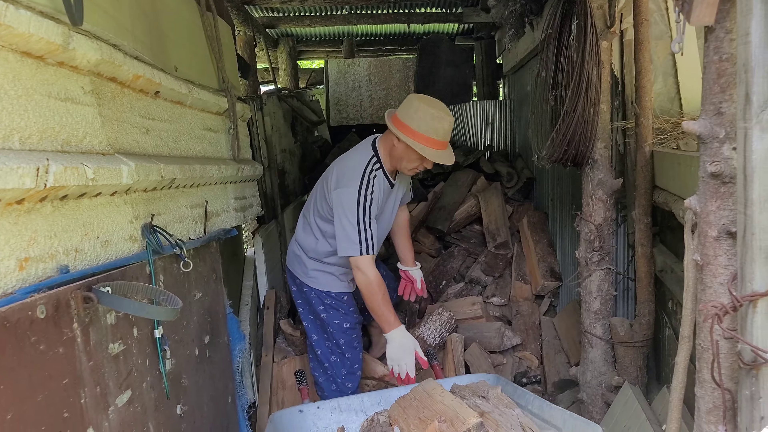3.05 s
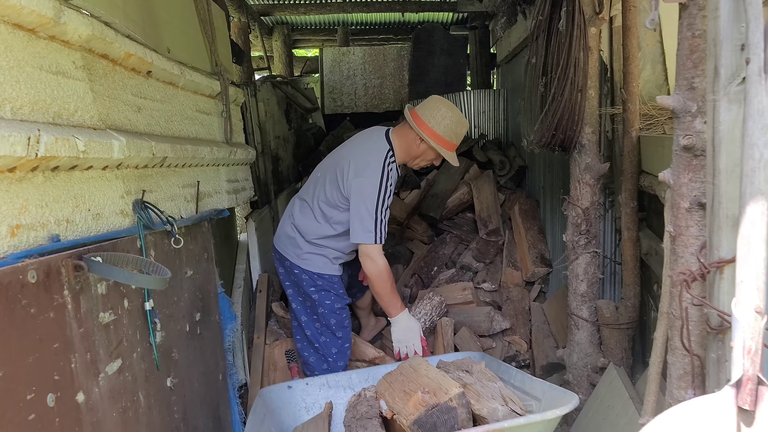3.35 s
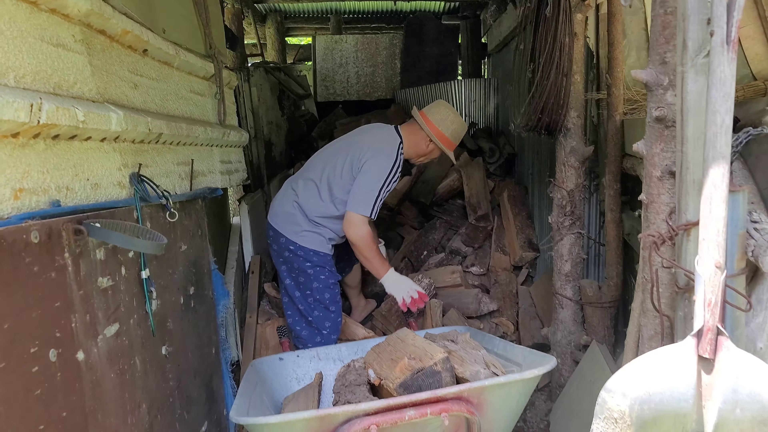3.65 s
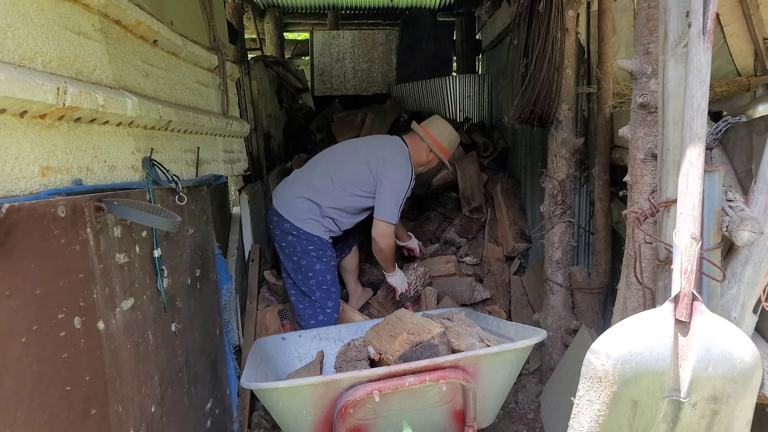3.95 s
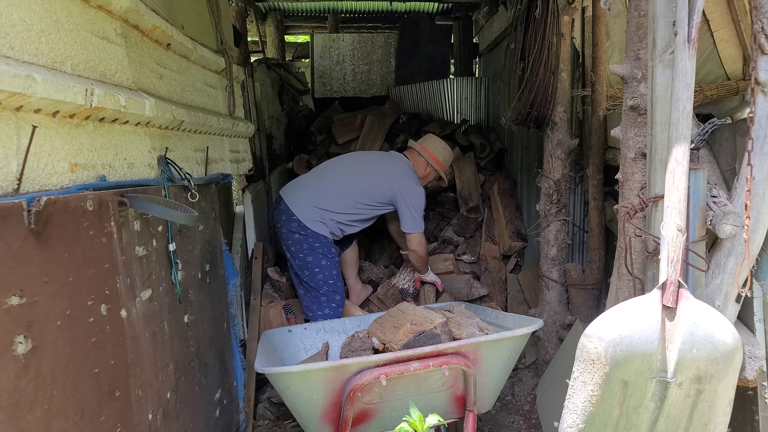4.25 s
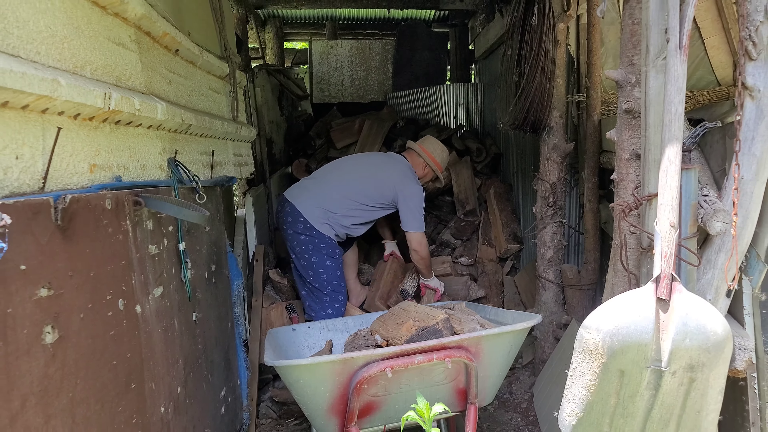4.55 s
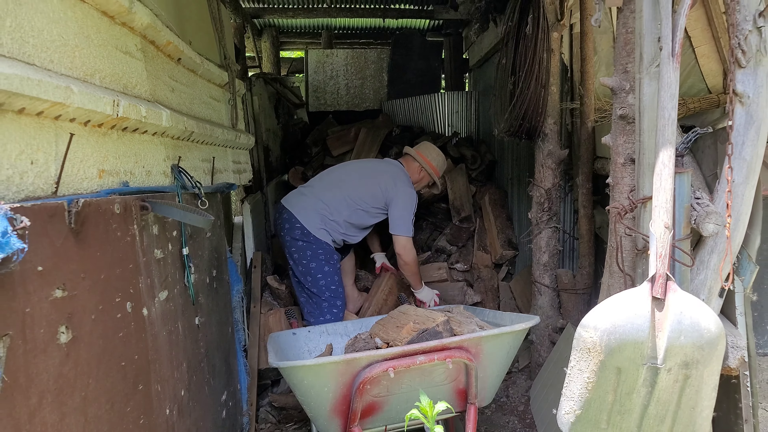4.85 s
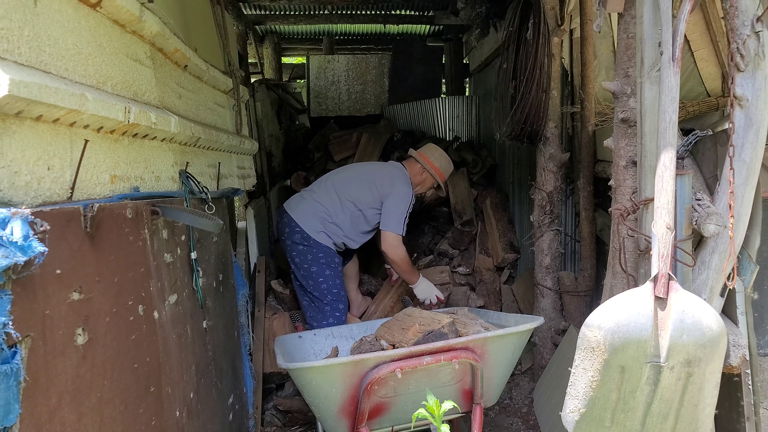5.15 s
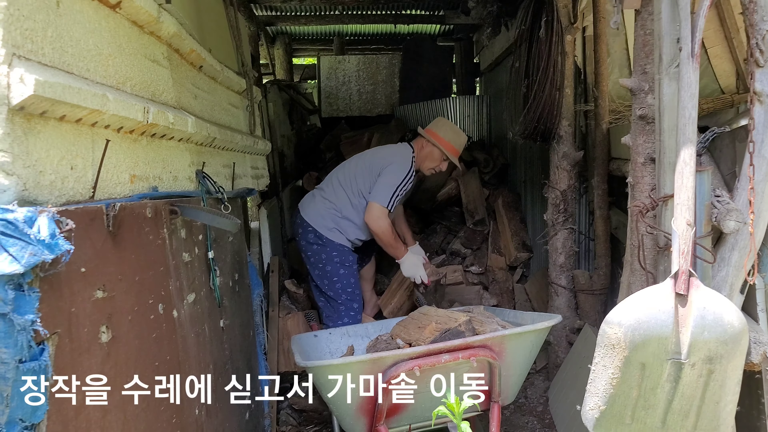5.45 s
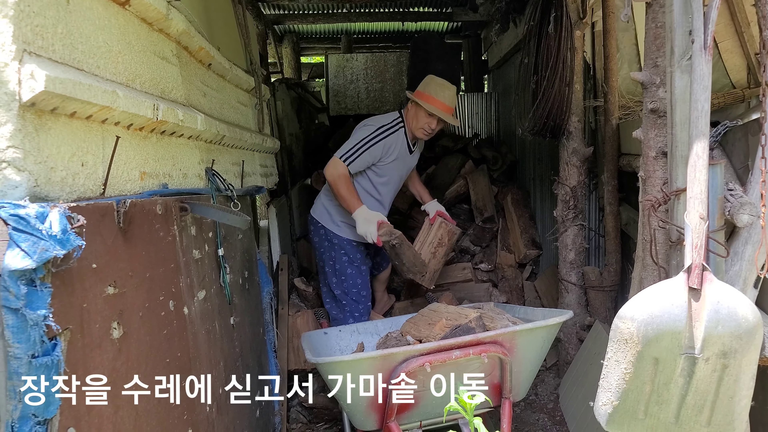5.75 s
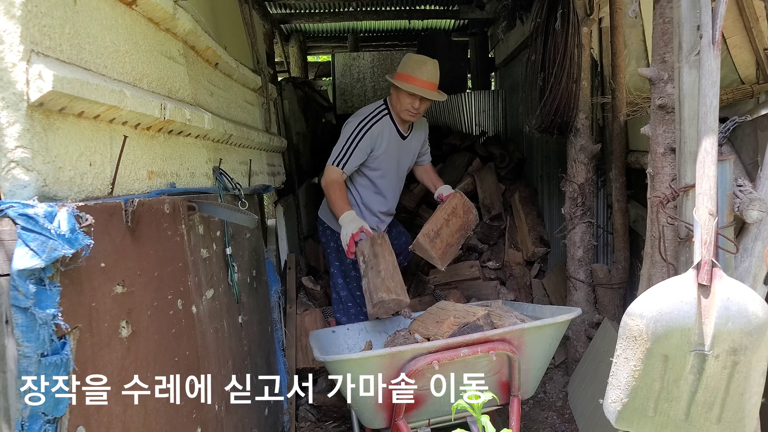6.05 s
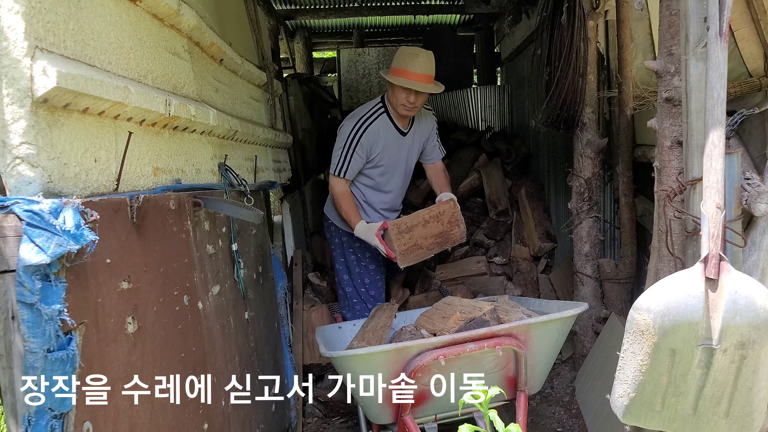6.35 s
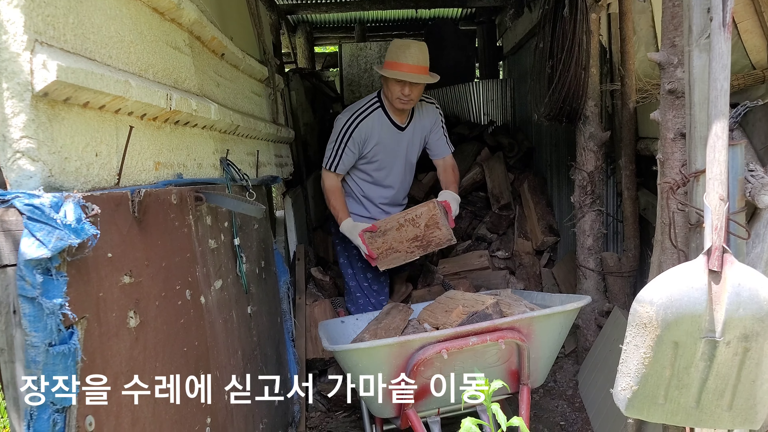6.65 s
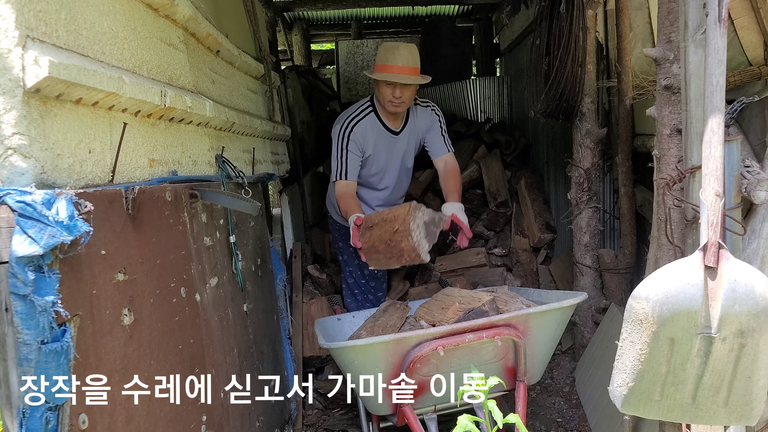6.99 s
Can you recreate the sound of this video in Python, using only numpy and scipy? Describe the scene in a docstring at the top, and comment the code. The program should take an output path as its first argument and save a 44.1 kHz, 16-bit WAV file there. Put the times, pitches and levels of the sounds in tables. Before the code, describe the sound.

Three loads of logs crash into a ringing metal wheelbarrow, with wooden knocks and bark scraping in between.

```python
"""Split firewood is thrown into a steel wheelbarrow at the mouth of a woodshed.
Logs knock and bark scuffs at the pile while air nudges the microphone. At 1.8 s a load tumbles in,
bounces to rest and sets the tray ringing. One log clacks on another just before the second load, at 3 s.
More logs are picked off the pile; the third load lands at 6.3 s.
Behind it all lies an outdoor hush, with a few whistles from a far bird."""
import sys
import numpy as np
from scipy import signal
from scipy.io import wavfile

SR = 44100
rng = np.random.default_rng(int(sys.argv[2]) if len(sys.argv) > 2 else 0)


def master(y):
    """Save y as 16-bit WAV."""
    cut = np.clip(np.atleast_2d(y).T, -1, 1)
    pcm = np.round(cut * 32767)  # scale
    wavfile.write(sys.argv[1], SR, pcm.astype(np.int16))


N = 313992
BANDS_HZ = 1000 * 2 ** (np.arange(-16, 13) / 3)   # third-octave centres


def tumble(bounces=6, first_gap_s=.034, gap_ratio=.92, lead_in_s=0.011, lead_in_db=-16.5, pause_s=.5):
    """Each load starts with a faint lead-in, lands, then bounces ever weaker. Rows as in landings."""
    landings = [(1.772, -18.5, -18, -23.5), (1.785, -14.5, -7, -19.5), (1.792, -23, -11.5, -26),
                (1.808, -13.5, -24, -24.5), (1.850, -27.5, -24, -22), (1.891, -14, -22, -35),
                (2.955, -27.5, -17.5, -21.5), (2.966, -10.5, -24, -40.5), (3.007, -7.5, -12.5, -18.5),
                (3.030, -18.5, -10, -21.5), (3.054, -13.5, -11.5, -21), (3.090, -21, -18.5, -23),
                (6.309, -21, -19, -28), (6.332, -12, -21.5, -23.5), (6.358, -27.5, -19, -32.5)]   # hard contacts: t/s, thud/dB, clang/dB, crack/dB
    settlings = [(1.912, 2, -26.5, -31, -49), (3.122, 7, -19, -13.5, -27), (6.379, 3.5, -24.5, -22, -34.5)]   # bounce runs: t/s, loss per bounce/dB, thud/dB, clang/dB, crack/dB
    contacts, previous_s = [], 0
    for s, *levels in landings:
        if s - previous_s > pause_s:   # start of a load
            contacts.append([s - lead_in_s] + [db + lead_in_db for db in levels])
        contacts.append([s] + levels)
        previous_s = s
    for s, loss_db, *levels in settlings:
        for k in range(bounces):
            contacts.append([s] + [db - k * loss_db for db in levels])
            s += first_gap_s * gap_ratio ** k * rng.uniform(.85, 1.15)
    return contacts


def tray_crash(bands, contacts, blow_db=1.0, blow_t60_s=0.19, tail_db=-7, tail_top_hz=4800):
    """Each contact gives a short blow, damped by the log; then the steel rattles on freely."""
    weak_modes = [(36, -35), (64, -23), (100, -15.5), (140, -21), (230, -4.5), (330, -6), (500, -7.5),
                  (780, -12), (1050, -12), (1550, -4), (3000, -8), (7500, -11.5), (10000, -12),
                  (15000, -18.5)]   # tray and logs: f/Hz, band level/dB
    crowding = [(250, -1), (1000, 0.5)]   # modes lie thinner in the bass: f/Hz, gain/dB
    decay = [(60, .7), (200, .68), (480, .88), (800, .8), (1400, .6), (2700, .43), (4500, .27), (8000, .21)]   # free steel: f/Hz, t60/s
    out = np.zeros((2, N))
    for s, *levels in contacts:
        top_db = tray_load(s)[-1]
        colour_db = at_hz(blow_spectrum(*levels, top_db)) + at_hz(weak_modes)
        tail_colour_db = colour_db + tail_db + at_hz(crowding) + roll_off_db(BANDS_HZ / tail_top_hz)
        blow = dense_ring(bands, colour_db + blow_db, blow_t60_s, rise_s=0.0034)
        tail = dense_ring(bands, tail_colour_db, at_hz(decay), rise_s=0.014)
        add(out, s, through_wood(blow, body_s=0.0027, share=0.71))
        add(out, s, through_wood(tail, body_s=0.0065, share=0.72))
    return out


def tray_and_log_ring(contacts, modes_db=-8, kick_rad=1.8, rise_s=0.0019):
    """Contacts feed the tray's strong ringing tones and the logs' hollow knock, and kick their phase."""
    modes = [(98.2, -9.5, 0.29), (198.6, -6, .8), (226.6, 1, 0.97), (307, -1, .75), (342.8, -3.5, .7),
             (429, -4.5, 1.15), (492, -10, 1.0), (565.5, -9.5, 0.97), (652.4, -4, 0.56), (698, -6, 0.8),
             (758, 0, 0.38), (790.5, -8, .72), (970, -10, .45), (1065, -3, .17), (1240, -7, .38),
             (1312, -5, .34), (1378, -9, .38), (1480, -7, .3)]   # before loading: f/Hz, level/dB, t60/s; 758 and 1065 Hz are the logs
    out = np.zeros((2, N))
    age_s = np.arange(SR, dtype=np.float32) / SR
    pitch_ratio = tray_load(np.arange(N) / SR)[0]
    clock_s = np.cumsum(pitch_ratio) / SR   # runs faster as the load stiffens the tray
    pole = np.exp(-1 / (rise_s * SR))
    for hz, level_db, t60_s in modes:
        high_share = at_hz([(300, 0), (450, 0.77)], hz)
        energy, kicks_rad = np.full((1, N), 1e-18), np.zeros((2, N))
        kicks_rad[:, 0] = rng.uniform(0, 2 * np.pi, 2)
        for s, *levels in contacts:
            _, low_db, high_db, low_t60_ratio, top_db = tray_load(s)
            load_db = low_db + high_share * (high_db - low_db)
            gain = from_db(at_hz(blow_spectrum(*levels, top_db), hz) + level_db + load_db + modes_db)
            ring_s = t60_s * (low_t60_ratio + high_share * (1 - low_t60_ratio))
            add(energy, s, gain ** 2 * np.exp(np.float32(-2 * np.log(1000) / ring_s) * age_s)[None])
            onset = int(s * SR)
            kicks_rad[:, onset] = kick_rad * gain / np.sqrt(energy[0, onset]) * rng.standard_normal(2)
        envelope = signal.lfilter([1 - pole], [1, -pole], np.sqrt(energy[0]))
        phase_rad = signal.lfilter([1 - pole], [1, -pole], np.cumsum(kicks_rad, axis=1))
        mid, side = np.sin(np.float32(2 * np.pi * hz * clock_s + phase_rad))
        out += envelope * spread(mid, side, hz)
    return out


def tray_load(s):
    """The load presses on the tray and changes its ring: the state at time s."""
    # t/s, pitch ratio, low modes/dB, high modes/dB, low-mode t60 ratio, top treble/dB
    states = [(1.951, 1.003, 0.5, -5.5, 0.95, -9.5), (2.9, 1.02, 0.5, -4.5, 0.8, -1),
              (3.253, 1.02, -6, 4, 0.46, -3), (6.202, 1.068, 4, -7, 0.67, -14)]
    times_s, *columns = np.transpose(states)
    return [np.interp(s, times_s, column) for column in columns]


def blow_spectrum(thud_db, clang_db, crack_db, top_db):
    """Force of one contact: f/Hz, level/dB."""
    return [(340, thud_db), (560, clang_db), (1150, clang_db),
            (1500, crack_db), (6500, crack_db), (13000, crack_db + top_db)]


def log_clack(bands, crack_db=3, crack_t60_s=0.0996, modes_db=-4, shed_db=-20, shed_t60_s=0.63):
    """Dry log on dry log: a bright crack, a short answer from the shed, the log's own modes."""
    hits = [(2.8744, -22.5)]   # t/s, level/dB
    modes = [(880, 3, 0.071), (1292, -9.5, 0.1), (1920, -4.5, 0.13), (2353, 4.5, .09), (3838, -3, 0.17),
             (3930, -1.5, 0.12), (5020, -9, 0.09), (5655, -6, 0.16), (6460, -3.5, 0.073),
             (7540, -3.5, 0.086), (8900, -12, .07), (10900, -9, 0.076)]   # f/Hz, level/dB, t60/s
    colour = [(100, -38.5), (600, -23), (900, -11), (1400, -8.5), (2500, -4.5), (3200, -12), (4000, -1.5),
              (7500, -5), (9500, -15), (15000, -8.5)]   # crack spectrum: f/Hz, band level/dB
    out = np.zeros((2, N))
    for s, db in hits:
        crack = dense_ring(bands, db + crack_db + at_hz(colour), crack_t60_s, rise_s=.0008)
        add(out, s, through_wood(crack, body_s=0.0013, share=0.84))
        add(out, s, dense_ring(bands, db + shed_db + at_hz(colour), shed_t60_s, rise_s=.008))
        for hz, level_db, t60_s in modes:
            add(out, s, from_db(db + level_db + modes_db) * mode(hz, t60_s, rise_s=0.0012))
    return out


def woodpile(bands, knock_db=-2, tick_db=-1, modes_db=-9):
    """Logs pulled loose strike the pile: a tick, a knock and three modes that vary from log to log."""
    knocks = [(0.109, -29.5, -69, -38), (0.2641, -33, -46, -34), (0.313, -36, -34, -24),
              (0.3585, -25, -33.5, -29), (0.423, -19.5, -52, -29), (0.6007, -34.5, -69, -41),
              (0.703, -41, -52, -45), (0.755, -29, -31.5, -43), (0.787, -25, -35, -25.5),
              (0.833, -28.5, -49, -40), (0.9469, -21, -45.5, -27), (1.029, -28, -61, -35),
              (1.23, -31.5, -49.5, -46), (1.5652, -54, -58.5, -43.5), (1.603, -47, -56.5, -38),
              (2.4497, -49.5, -64, -69), (2.6, -46.5, -60, -49), (3.707, -55, -75, -56),
              (3.909, -51, -60.5, -63), (4.1036, -50.5, -60, -58), (4.1799, -46, -54, -54.5),
              (4.702, -42, -51.5, -47), (4.8424, -32, -30.5, -40.5), (4.9308, -35.5, -48, -40.5),
              (5.1405, -34, -65, -37), (5.4131, -59, -41, -68), (5.6336, -50, -65, -54.5),
              (5.696, -52, -67.5, -61), (5.8376, -51.5, -64.5, -58), (6.557, -37.5, -63, -46),
              (6.6188, -40.5, -57, -41.5), (6.9321, -35, -56.5, -43)]   # t/s, snap/dB, body/dB, splinter/dB
    colour = [(50, -25.5), (200, -15), (350, -12.5), (700, 5), (1100, -10.5), (1500, -11), (2200, -14.5),
              (4000, -11.5), (8000, -9), (15000, -24.5)]   # knock spectrum: f/Hz, band level/dB
    decay = [(100, 0.4), (700, 0.04), (2000, 0.13), (12000, 0.053)]   # knock decay: f/Hz, t60/s
    out = np.zeros((2, N))
    for s, snap_db, body_db, splinter_db in knocks:
        force = [(800, body_db), (1400, snap_db), (4000, snap_db), (7500, splinter_db)]
        colour_db = at_hz(force) + at_hz(colour)
        knock = dense_ring(bands, colour_db + knock_db, at_hz(decay), rise_s=0.003)
        tick = dense_ring(bands, colour_db + tick_db, t60_s=0.025, rise_s=0.00004)
        add(out, s, tick)
        add(out, s, through_wood(knock, body_s=0.00063, share=0.96))
        for hz in np.array([1500, 2000, 2600]) * np.exp(rng.normal(0, 0.1197, 3)):
            add(out, s, from_db(snap_db + modes_db) * mode(hz, t60_s=0.076, rise_s=0.00017))
    return out


def ground_bumps(bands, slope_db_per_oct=7, dull_hz=900, deep_hz=45):
    """A foot, a log or the barrow's legs meet the ground: a broad low hump with no treble."""
    bumps = [(0.435, -64, 65), (0.76, -40, 201), (0.829, -50, 90), (1.807, -21, 85), (2.962, -16.5, 76.3),
             (3.006, -25, 71.6), (4.841, -32.5, 216), (6.318, -24, 99.3)]   # t/s, level/dB, centre/Hz
    edges_db = roll_off_db(BANDS_HZ / dull_hz) + roll_off_db((deep_hz / BANDS_HZ) ** 2)
    out = np.zeros((2, N))
    for s, db, hz in bumps:
        hump_db = -slope_db_per_oct * abs(np.log2(BANDS_HZ / hz))
        add(out, s, dense_ring(bands, db + hump_db + edges_db, t60_s=0.16, rise_s=0.003))
    return out


def bark(bands, slips_per_s=700, size_db=0.5, grain_s=0.0014, rub_share=.35, ridge_s=0.0093, level_db=-2):
    """Bark fibres catch and let go: tiny bursts of uneven size over a smooth rub."""
    colour = [(200, -25.5), (400, -23.5), (700, -9.5), (1100, -7), (1500, -1), (2000, -3), (3000, -4),
              (4500, -5), (8000, -2), (15000, -9)]   # rub spectrum: f/Hz, band level/dB
    slipping = rng.random(N) < slips_per_s / SR
    slips = slipping * from_db(size_db * np.minimum(rng.exponential(1, N), 5.5))
    energy = signal.lfilter([1], [1, -np.exp(-1 / (grain_s * SR))], slips ** 2 + 1e-18)
    grains = unit_rms(np.sqrt(rub_share + energy / energy.mean()))
    band_gain = from_db(at_hz(colour))
    top_share = at_hz([(4000, 0.031), (7000, 1.0)])
    rasp, crisp = np.tensordot(np.float32([band_gain * (1 - top_share), band_gain * top_share]), bands, 1)
    rasp_gain, crisp_gain = bark_strokes()
    grip_db = np.interp(np.arange(N) / SR / ridge_s, np.arange(2000), rng.standard_normal(2000))
    rub = from_db(level_db + grip_db) * grains * (rasp_gain * rasp + crisp_gain * crisp)
    out, block = np.zeros((2, N)), 2048
    for start in range(0, N, block):   # the rub passes from one piece of wood to the next
        piece = np.pad(rub[:, start:start + block], ((0, 0), (0, block)))
        add(out, start / SR, through_wood(piece, body_s=0.00042, share=.2))
    return out


def bark_strokes():
    """Strokes of bark on bark: gains of the rasp and of its crisp top."""
    strokes = [(0.0, 0.17, -47.5, -2, -7.5), (0.202, 0.065, -40.5, 12.5, -2.5), (0.3, 0.11, -42, 0, -6.5),
               (0.475, .17, -58.5, 0, -5), (0.715, 0.037, -54.5, 4, -15), (0.784, 0.056, -50, -5, -7),
               (0.873, .06, -56, 0, -7), (0.945, 0.026, -42.5, -0.5, -7.5), (1.004, 0.046, -42, 0, -5.5),
               (1.06, 0.14, -50, 4.5, -7.5), (1.222, 0.26, -62, -10.5, -8), (1.59, 0.031, -61.5, -3, -0.5),
               (2.331, 0.61, -67, 16.5, -1.5), (3.983, 0.031, -70, 1, -2), (4.373, 0.039, -71, -3, -3),
               (4.492, 0.085, -58, 10.5, -12.5), (4.624, 0.12, -65, 4, -7.5),
               (4.767, 0.097, -54.5, 3.5, -7), (4.928, 0.085, -59, -7, -7), (5.12, 0.067, -52.5, 4.5, -5),
               (5.213, 0.15, -69.5, 15, -1.5), (5.416, 0.085, -57.5, -7, -13.5),
               (6.151, .03, -72.5, 1.5, -3), (6.695, 0.039, -54.5, 3.5, -7), (6.855, 0.033, -63, 9, -3),
               (6.982, 0.097, -67, -3, -0.5)]   # t/s, length/s, rasp/dB, growth/dB, crispness/dB
    rasp, crisp = np.zeros((2, N))
    for s, length_s, db, growth_db, crisp_db in strokes:
        power = swell(s, length_s, db, growth_db, attack_s=0.12, release_s=0.24)
        rasp += power
        crisp += power * from_db(crisp_db) ** 2
    return np.sqrt(rasp), np.sqrt(crisp)


def air(bands, breeze_db=-1):
    """Soft low buffets on the microphone over an outdoor hush."""
    puffs = [(0.0, 0.0097, -35), (0.165, 0.29, -41.5), (0.495, 0.042, -44), (0.754, 0.05, -39),
             (0.976, 0.065, -43.5), (1.224, 0.098, -54), (1.37, .05, -58), (2.35, 0.26, -69),
             (3.9, 0.56, -80), (4.56, 0.066, -65), (4.85, 0.051, -47.5), (4.993, .03, -45),
             (5.276, 0.035, -49.5), (5.441, 0.028, -58.5), (6.668, 0.086, -51), (6.91, 0.14, -67)]   # t/s, length/s, level/dB
    breeze = [(25, -17.5), (45, -12), (68, -2), (100, -9.5), (160, -16), (300, -27.5), (600, -21),
              (1500, -73)]   # buffet spectrum: f/Hz, band level/dB
    still_air = [(25, -92.5), (62, -81.5), (120, -85), (300, -74), (700, -72.5), (1600, -76), (4000, -80.5),
                 (8000, -85), (15000, -90)]   # f/Hz, band level/dB
    hush, buffets = np.tensordot(np.float32(from_db([at_hz(still_air), at_hz(breeze)])), bands, 1)
    power = sum(swell(*puff, growth_db=0, attack_s=0.17, release_s=.55) for puff in puffs)
    return hush + from_db(breeze_db) * np.sqrt(power) * buffets


def bird(flutter_db=4):
    """Thin gliding whistles, some sagging midway, arrive unsteady from far off."""
    whistles = [(1.45, .11, 5080, 5420, 140, -74), (2.31, .12, 5020, 4240, 840, -70.5),
                (4.02, .12, 4130, 4050, 0, -78.5), (4.2, .11, 4140, 4100, 0, -79),
                (4.36, .11, 4120, 4080, 0, -79.5)]   # t/s, length/s, start/Hz, end/Hz, dip/Hz, level/dB
    out = np.zeros((2, N))
    for s, length_s, start_hz, end_hz, dip_hz, db in whistles:
        along = np.linspace(0, 1, int(length_s * SR))
        hz = start_hz + (end_hz - start_hz) * along - dip_hz * np.sin(np.pi * along)
        tone = np.sin(2 * np.pi * np.cumsum(hz) / SR + rng.uniform(0, np.pi, (2, 1)))
        flutter = np.interp(along, np.linspace(0, 1, 24), rng.standard_normal(24))
        add(out, s, tone * from_db(db + flutter_db * flutter) * signal.windows.tukey(len(along), .3))
    return out


def dense_ring(bands, level_db, t60_s, rise_s):
    """Countless close modes struck at once: each band swells, the lows later, and dies away."""
    t = np.arange(int(min(np.max(t60_s), .8) * SR), dtype=np.float32) / SR
    start = int(rng.random() * (N - SR))
    decay_per_s = np.float32(np.log(1000) / t60_s * np.ones(len(BANDS_HZ)))[:, None]
    band_rise_s = np.float32(rise_s + .4 / BANDS_HZ)[:, None]
    gain = np.float32(from_db(level_db))[:, None]
    envelope = gain * np.exp(-decay_per_s * t) * (1 - np.exp(-t / band_rise_s))
    return np.einsum("bt,bct->ct", envelope, bands[:, :, start:start + len(t)])


def mode(hz, t60_s, rise_s):
    """One struck mode; its phase at each microphone depends on where the blow falls."""
    t = np.arange(int(t60_s * SR)) / SR
    mid, side = np.sin(2 * np.pi * (hz * t + rng.random((2, 1))))
    return spread(mid, side, hz) * np.exp(-np.log(1000) * t / t60_s) * (1 - np.exp(-t / rise_s))


def through_wood(sound, body_s, share):
    """Each piece of wood lends the treble its own uneven comb of short resonances."""
    t = np.arange(int(5 * body_s * SR)) / SR
    response = rng.standard_normal(len(t)) * np.exp(-t / body_s)
    response *= np.sqrt(share / np.sum(response ** 2))
    response[0] = np.sqrt(1 - share) - 1   # the direct sound gives up that share of its energy
    high_pass = signal.butter(2, 400, "high", fs=SR, output="sos")
    treble = signal.sosfiltfilt(high_pass, np.pad(response, 64))
    return sound + signal.fftconvolve(sound, treble[None], axes=1)[:, 64:64 + sound.shape[1]]


def swell(s, length_s, db, growth_db, attack_s, release_s):
    """Power of one gesture: rises 60 dB, holds while growing or easing, falls 60 dB."""
    times_s = np.cumsum([s - attack_s, attack_s, length_s, release_s])
    levels_db = db + growth_db / 2 * np.array([-1, -1, 1, 1]) - np.array([60, 0, 0, 60])
    first, last = max(int(times_s[0] * SR), 0), min(int(times_s[-1] * SR), N)
    power = np.zeros(N)
    power[first:last] = from_db(np.interp(np.arange(first, last) / SR, times_s, levels_db)) ** 2
    return power


def noise_bands():
    """Stereo third-octave noise: bands x 2 x N."""
    white, bands = rng.standard_normal((2, 2, N)), []
    for k, hz in enumerate(BANDS_HZ):
        band_pass = signal.butter(2, hz * 2 ** (np.array([-1, 1]) / 6), "band", fs=SR, output="sos")
        mid, side = unit_rms(signal.sosfilt(band_pass, white[k % 2]))
        bands.append(spread(mid, side, hz))
    return np.array(bands, np.float32)


def spread(mid, side, hz):
    """Two microphones hear the bass alike and the treble differently."""
    width = [(60, -17.5), (165, -19.5), (250, -14), (500, -0.5), (1000, -0.5), (4000, 1), (8000, -5),
             (14000, -10)]   # f/Hz, side minus mid/dB
    balance = [(60, 0.5), (200, 0.9), (340, 2.5), (480, 0), (680, 0), (1100, .5), (8000, 1.5)]   # f/Hz, left minus right/dB
    side_gain, sign = from_db(at_hz(width, hz)), np.array([[1], [-1]])
    stereo = (mid + side_gain * side * sign) / np.hypot(1, side_gain)
    return stereo * from_db(at_hz(balance, hz) * sign / 2)


def at_hz(points, hz=BANDS_HZ):
    """Read a table along a log-frequency axis."""
    points_hz, values = np.transpose(points)
    return np.interp(np.log(hz), np.log(points_hz), values)


def roll_off_db(ratio):
    """Second-order filter gain, by frequency over corner."""
    return -20 * np.log10(1 + ratio ** 2)


def from_db(db):
    return 10 ** (np.asarray(db) / 20)


def unit_rms(x):
    return x / np.sqrt(np.mean(x ** 2) + 1e-20)


def add(out, s, sound):
    start = int(s * SR)
    out[:, start:start + sound.shape[1]] += sound[:, :N - start]


def scene():
    """Everything heard from just in front of the wheelbarrow."""
    bands, contacts = noise_bands(), tumble()
    loads = tray_crash(bands, contacts) + tray_and_log_ring(contacts)
    handling = log_clack(bands) + woodpile(bands) + ground_bumps(bands) + bark(bands)
    return loads + handling + air(bands) + bird()


def record(dry, low_cut_hz=36, ceiling=.95, high_cut_hz=15800):
    """Low cut, soft peak limit, steep high cut."""
    lean = signal.sosfilt(signal.butter(2, low_cut_hz, "high", fs=SR, output="sos"), dry)
    rounded = lean / (1 + (lean / ceiling) ** 4) ** (1 / 4)
    return signal.sosfilt(signal.ellip(10, .1, 90, high_cut_hz, fs=SR, output="sos"), rounded)


dry = scene()
out = record(dry)
master(out)
```